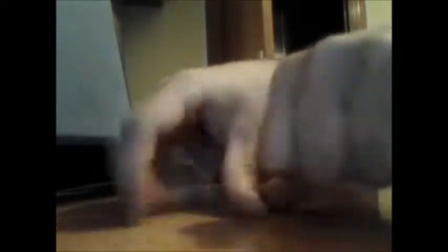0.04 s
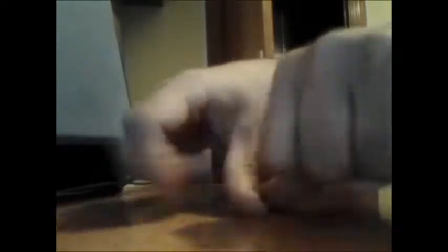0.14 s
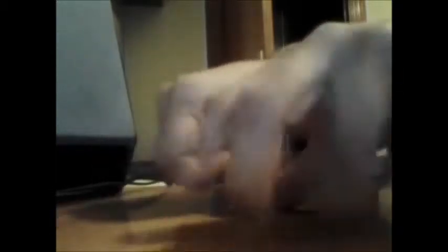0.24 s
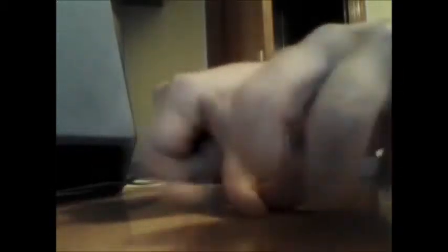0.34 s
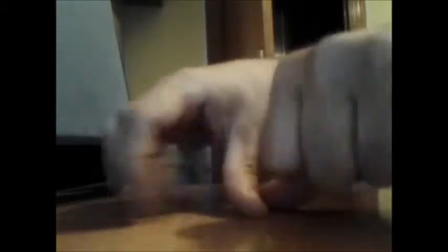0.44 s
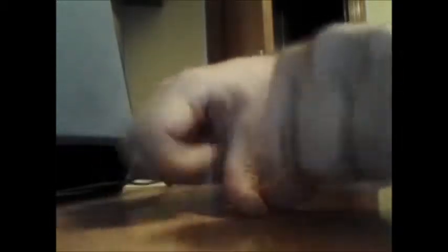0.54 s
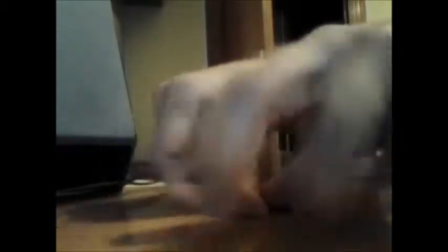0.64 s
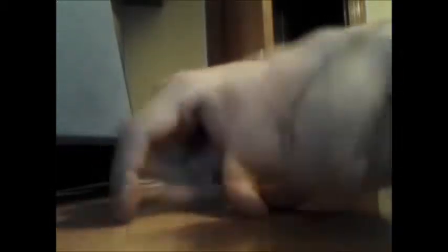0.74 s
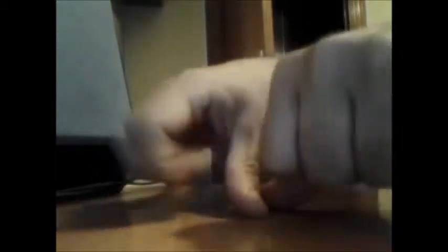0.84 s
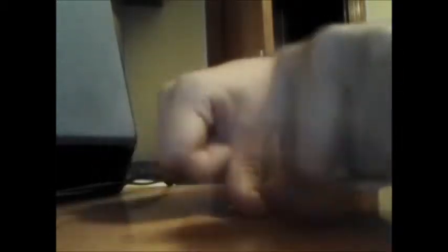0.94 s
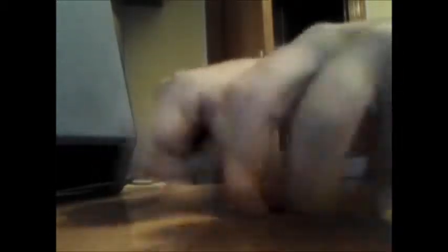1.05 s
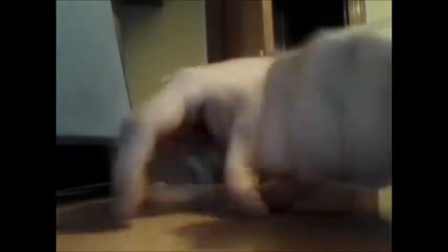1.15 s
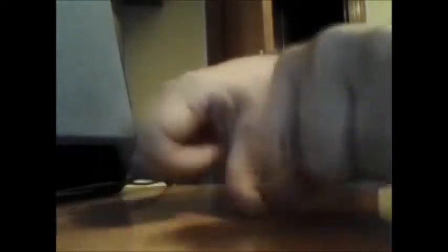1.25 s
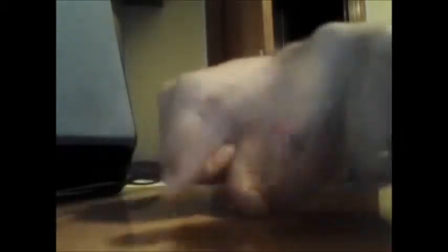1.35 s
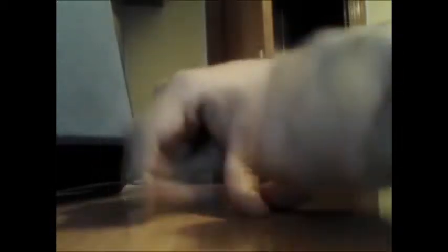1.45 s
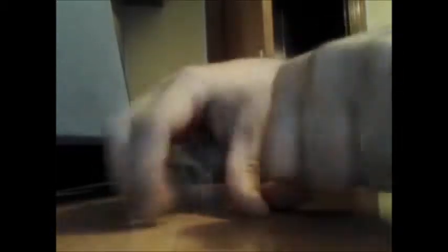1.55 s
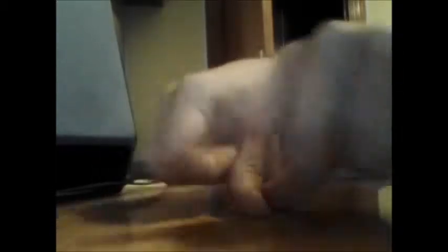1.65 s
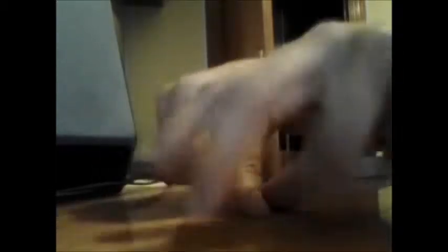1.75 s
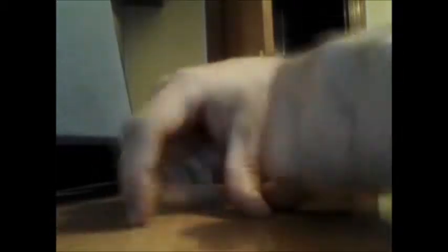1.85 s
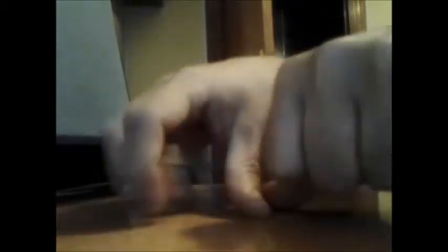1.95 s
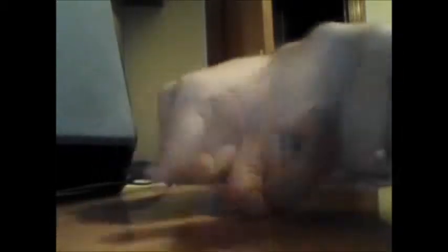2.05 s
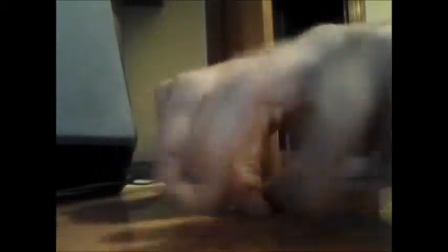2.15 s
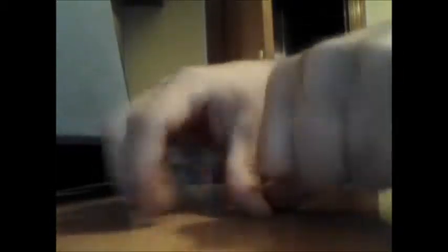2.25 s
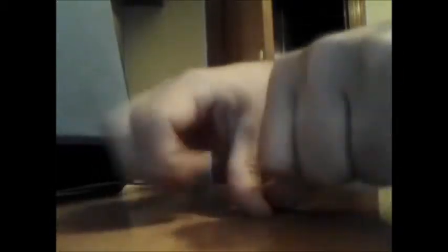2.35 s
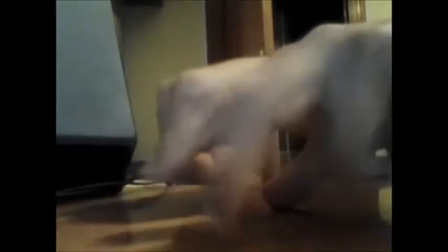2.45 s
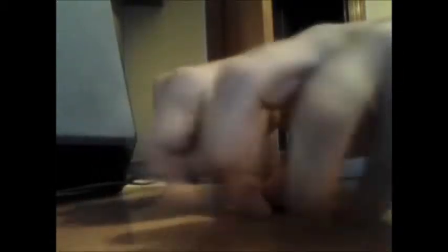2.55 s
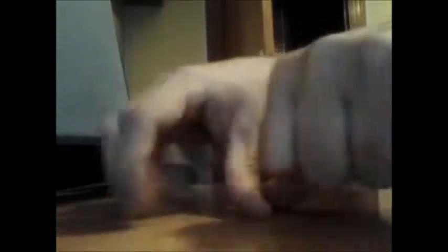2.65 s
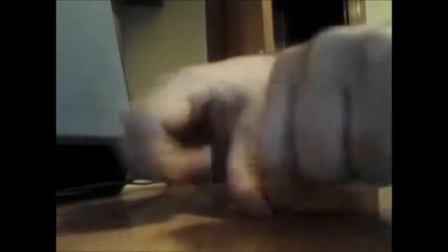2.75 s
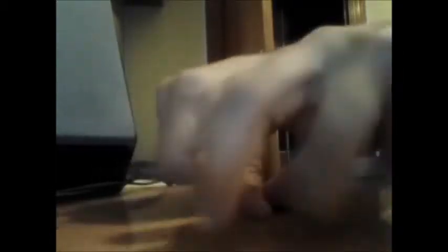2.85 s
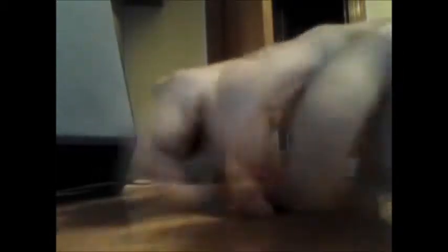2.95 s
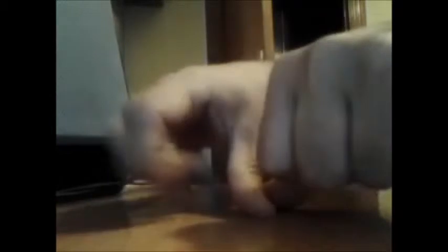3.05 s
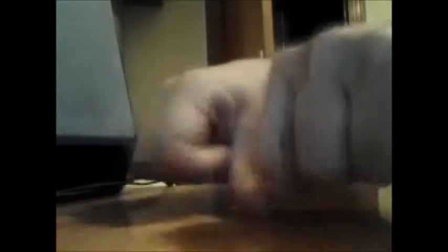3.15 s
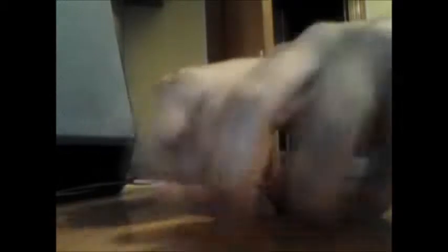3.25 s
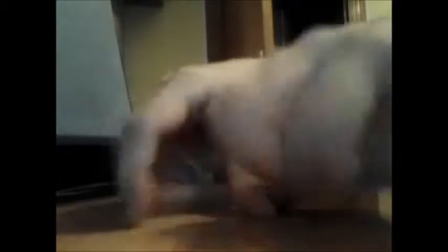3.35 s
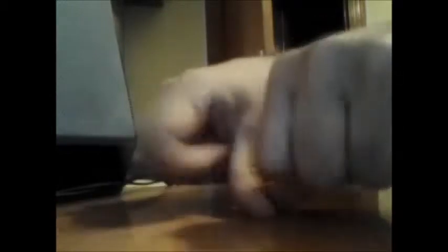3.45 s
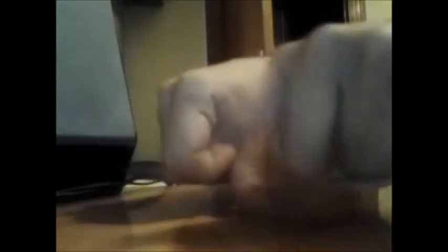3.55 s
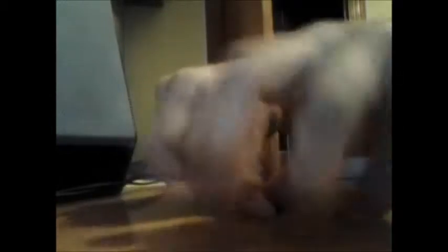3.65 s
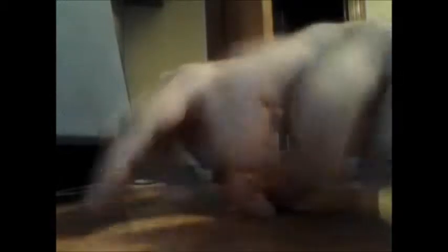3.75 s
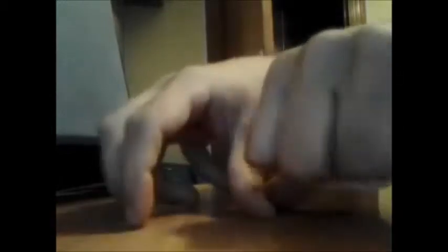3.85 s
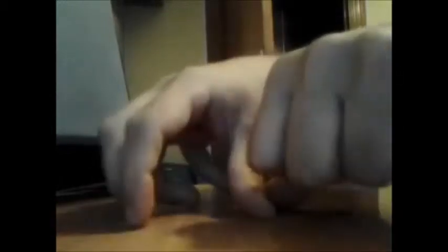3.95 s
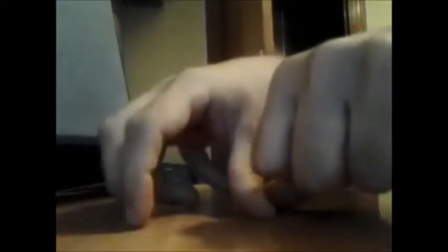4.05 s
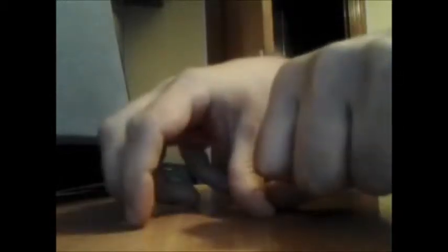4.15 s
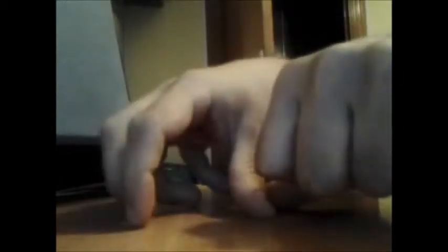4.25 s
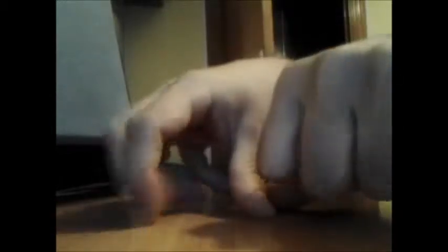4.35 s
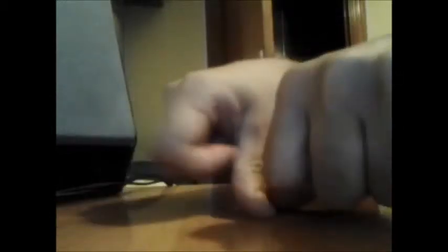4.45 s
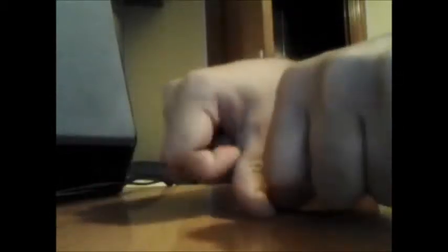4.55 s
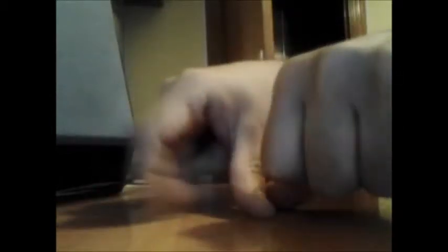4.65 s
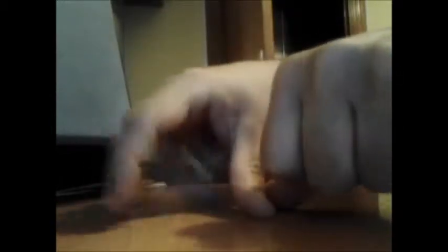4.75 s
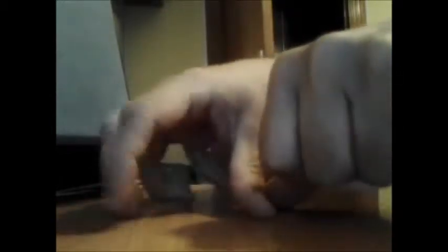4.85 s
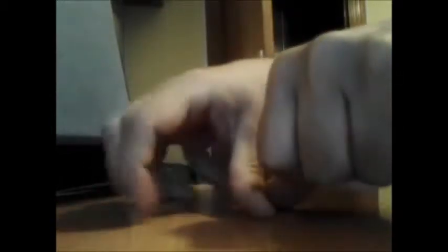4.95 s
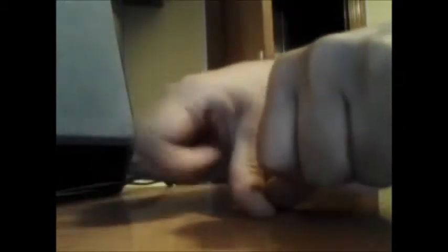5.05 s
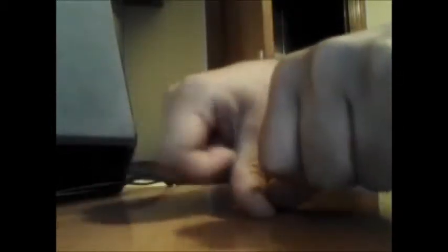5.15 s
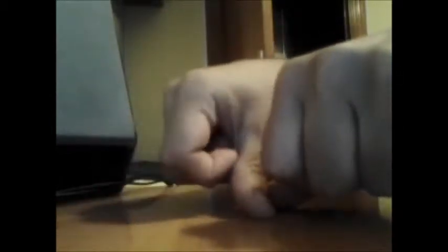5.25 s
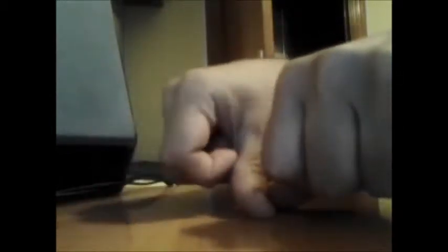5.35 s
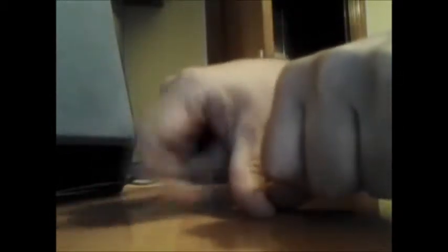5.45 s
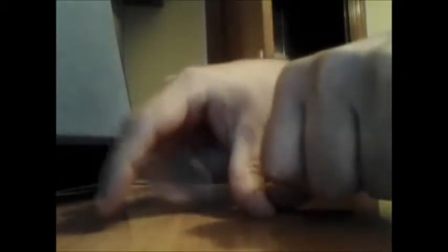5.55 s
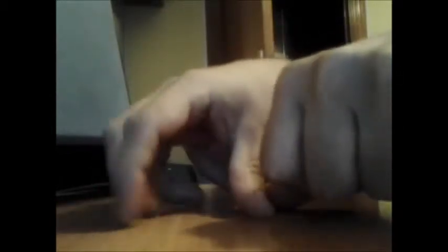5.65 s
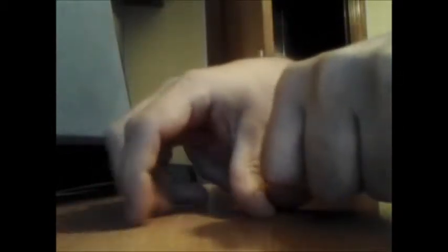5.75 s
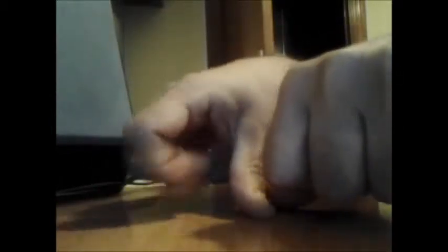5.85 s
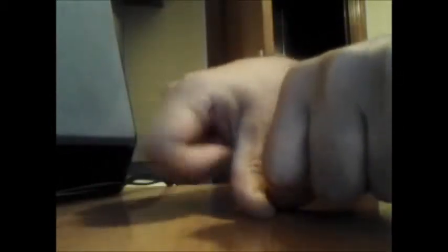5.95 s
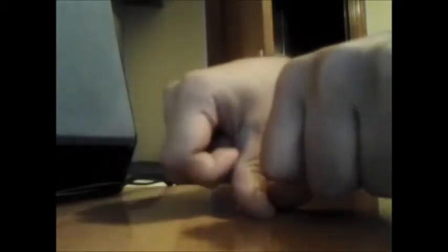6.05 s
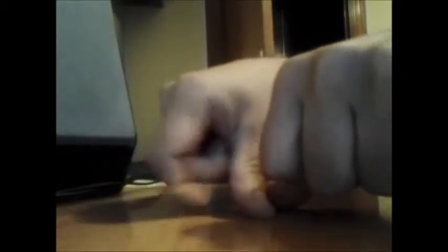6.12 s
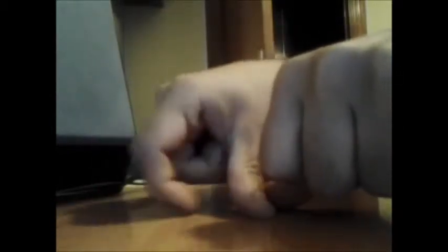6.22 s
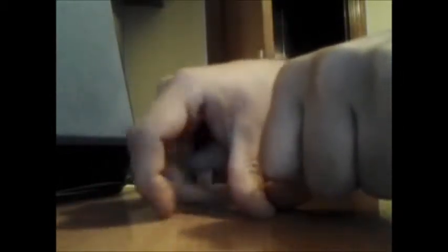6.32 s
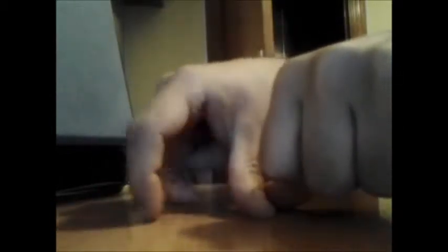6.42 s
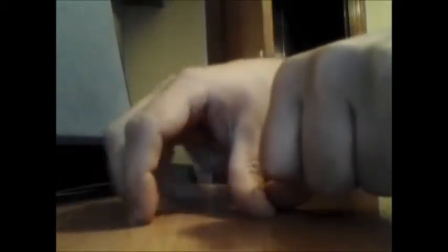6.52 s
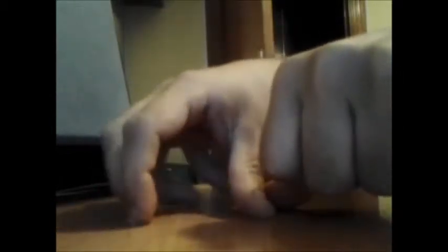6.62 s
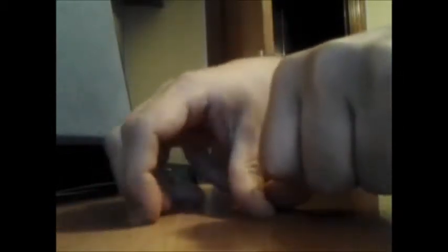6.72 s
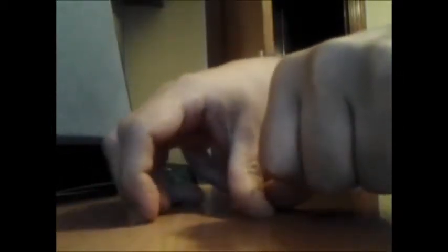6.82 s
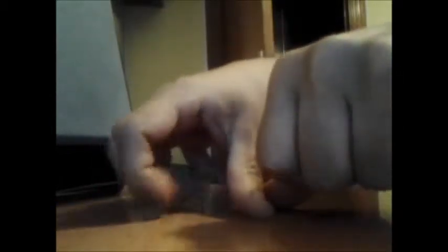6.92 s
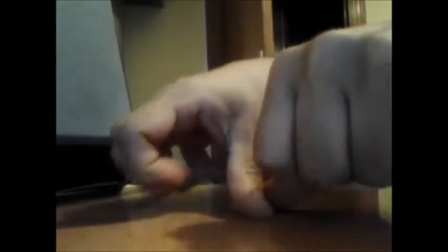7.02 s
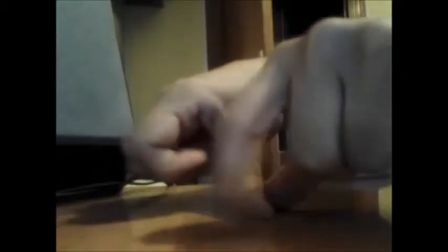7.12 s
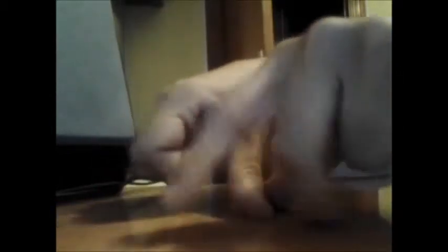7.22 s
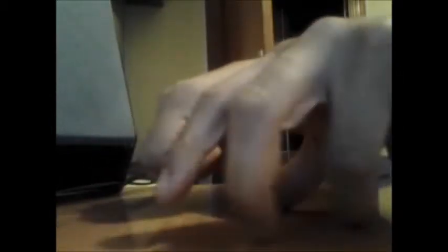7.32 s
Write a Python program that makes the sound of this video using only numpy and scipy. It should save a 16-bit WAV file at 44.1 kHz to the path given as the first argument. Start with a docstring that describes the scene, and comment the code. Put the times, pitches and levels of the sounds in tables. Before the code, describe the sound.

From the very start, two hands drum on a wooden desk close to the microphone, trading fast four-finger rolls at about five or six rolls a second in a continuous gallop. Each fingertip makes a short, hollow, woody knock with a small nail tick, and the hardest hits overload the microphone slightly. The run stops at about 4 seconds. After a pause, one hand plays a slower, softer roll at around 4.8 seconds and another at around 5.6 seconds. Four single taps follow, evenly spaced between 6.3 and 6.8 seconds, and one last, duller tap lands at about 7.2 seconds. The room is small, adding a close echo and a brief ring behind each knock. A quiet, steady fan and faint hiss continue throughout, and the overall sound has little high treble.

```python
"""A small room with a quiet fan, where two hands drum on a wooden desk close to a webcam microphone. The hands
trade fast four-finger rolls; then the far one plays two slow rolls, and a few single taps follow. Each
fingertip pushes the board into a short woody ring while its nail adds a tick. A close echo hollows the knocks,
the room rings on behind them, and the hardest taps overload the microphone input."""
import sys
import numpy as np
from scipy import signal
from scipy.fft import rfft, irfft
from scipy.io import wavfile
from scipy.ndimage import uniform_filter1d

SR = 44100
rng = np.random.default_rng(int(sys.argv[2]) if len(sys.argv) > 2 else 0)


def transcribe(u):
    """Save the signal u as a 16-bit wav file named by the first command-line argument.

    u: samples, shape (n,) or (channels, n), limited to [-1, 1]; the rate is SR.
    q: integer samples, one column per channel.
    """
    v = np.clip(np.atleast_2d(u).T, -1, 1)
    q = np.round(v * 32767).astype(np.int16)
    wavfile.write(sys.argv[1], SR, q)


N = 325458

# tone colour of fan air and microphone hiss: (frequency [Hz], relative level [dB])
AIR_SPECTRUM = [(15, -55), (25, -11.5), (33, -5.5), (66, -9.5), (123, -23.5), (339, -8.5), (411, -6.5),
                (442, -4.5), (590, -5.5), (650, -3.5), (1030, -4), (1110, -7.5), (1190, -7), (6920, -18.5),
                (8000, -44.5), (10400, -56), (17600, -120)]
# faint fan tones: (pitch [Hz], relative level [dB])
FAN_TONES = [(452.2, -69.5), (516.8, -75), (656.8, -65.5), (1093, -67)]
# four-finger rolls; an outer finger lands upright (flatness under 1) or on its pad (over 1):
# (little finger time [s], ring time [s], middle time [s], index time [s], hand [0 near, 1 far],
#  accent [dB], little finger flatness [ratio], ring finger flatness [ratio])
FINGER_ROLLS = [(0.0201, 0.0752, .1101, .1618, 0, -0.47, 0.69, 0.96),
                (0.1818, .229, .271, .3189, 1, 0.04, 1.02, 1.16),
                (.3638, .4149, .4547, .5044, 0, 0.58, 1.64, 1.01),
                (.5314, .5846, .6309, .6822, 1, 0.54, 1.22, 0.91),
                (0.7276, 0.7789, .8253, .891, 0, 1.3, 1.42, 1.05),
                (0.8949, .9417, .9815, 1.033, 1, -0.1, 0.97, 0.93),
                (1.1158, 1.157, 1.202, 1.2501, 0, 0, 0.85, 1.09),
                (1.2565, 1.3105, 1.36, 1.414, 1, 0.15, 1.2, 1.22),
                (1.4577, 1.5125, 1.5545, 1.6042, 0, 0.77, 1.09, 0.85),
                (1.6379, 1.6845, 1.7266, 1.7851, 1, 0, 0.95, 0.89),
                (1.8242, 1.8733, 1.9249, 1.9823, 0, -.3, 0.46, 0.87),
                (2.003, 2.0581, 2.0976, 2.1577, 1, -0.46, 0.88, .82),
                (2.2, 2.2458, 2.3027, 2.3619, 0, -0.14, .85, 1),
                (2.362, 2.415, 2.4618, 2.511, 1, 0.5, 1.34, 0.89),
                (2.579, 2.6204, 2.6659, 2.7186, 0, 1, 1.14, 0.84),
                (2.7383, 2.7984, 2.8379, 2.9025, 1, 0.1, 1.17, 1.06),
                (2.946, 2.9885, 3.0343, 3.09, 0, -.5, 1.7, 1.3),
                (3.1228, 3.1656, 3.2071, 3.2583, 1, 1.5, 1.15, 1.09),
                (3.3301, 3.3839, 3.4314, 3.4776, 0, 1.15, 0.88, 0.88),
                (3.4627, 3.5166, 3.5528, 3.6059, 1, -0.35, 1.33, 1.04),
                (3.707, 3.7452, 3.7922, 3.8354, 0, 0.08, 0.99, 1.29),
                (3.8737, 3.9064, 3.9352, 4.0168, 1, -1.54, 0.98, 0.89),
                (4.8382, 4.884, 4.9409, 5.0249, 1, -4.5, 1.82, 1.43),
                (5.6491, 5.6978, 5.7591, 5.8328, 1, -3.5, 1.46, 1.15)]
# near hand's basic touch, little finger to index: (strength [dB], contact time [ms], nail tick [dB])
NEAR_TOUCH = [(-0.6, 0.54, -19.5), (4, 0.53, -24.5), (4, 0.68, -26), (5.5, 0.68, -27)]
# far hand's, with ring and middle on the nail: (strength [dB], contact time [ms], nail tick [dB])
FAR_TOUCH = [(3, 0.59, -24), (1.6, 0.37, -17.5), (2.5, 0.38, -14.5), (5, 0.77, -26)]
# modes of the board: (pitch [Hz], t60 [s], level under near hand [dB], level under far hand [dB])
DESK_MODES = [(257, 0.012, -50.5, -28), (397.6, 0.035, -19, -19.5), (505, 0.025, -28, -14.5),
              (504, 0.11, -18, -19), (717, 0.058, -15.5, -16), (726.8, 0.015, 2.5, 1.5),
              (797, 0.015, 2, 1.5), (845.3, 0.036, -27, -19), (1157, 0.014, -35, -12),
              (1145.5, 0.079, -20, -26.5), (1300, 0.013, -15, -8.5), (1440, 0.014, -8.5, -4.5),
              (1617, 0.012, -6.5, -5), (2020, 0.011, 5.5, 0), (2623, 0.0044, 12, 14),
              (2682, 0.0099, 10, 9.5), (3138, 0.013, 2.5, -4), (3717, 0.0077, 7, 7.5),
              (4760, 0.0016, 13.5, 9), (6400, 0.0031, 3.5, 1)]
# bands of the room's reverb: (frequency [Hz], level [dB], t60 [s])
REVERB_BANDS = [(178, -26, 0.4), (284, -4.5, 0.22), (332, 10, 0.21), (413, 15, 0.25), (530, 12, 0.19),
                (790, 18.5, 0.31), (920, 16.5, 0.18), (1500, 18.5, 0.32), (2354, 14.5, 0.34),
                (3250, 22, 0.24), (5030, 15, 0.19), (6800, 10, 0.28)]
# standing waves of the desk corner: (pitch [Hz], level [dB], t60 [s])
CORNER_MODES = [(328.6, -38, 0.17), (429.7, -34.5, 0.14), (518, -21.5, 0.12), (660.7, -56.5, 0.072),
                (782.5, -27.5, 0.22), (863, -38.5, 0.22), (988, -38.5, 0.4), (1291, -33, 0.37)]
# closing single taps, which ring the board from the far spot: (time [s], strength [dB], contact time [ms], nail
# tick [dB])
CLOSING_TAPS = [(6.3453, 2.5, 0.94, -28.5), (6.4895, -1.5, 0.54, -23.5), (6.647, -0.5, .54, -21),
                (6.7796, 4.5, 0.8, -28), (7.2338, -1, 1.04, -25)]


def undb(db):
    """Decibels to gain."""
    return 10 ** (np.asarray(db) / 20)


def fade(t, t60):
    """Exponential decay that loses 60 dB in t60 seconds."""
    return np.exp(-np.log(1000) * t / t60)


def add(track, start, sound):
    """Mix a sound into a track at a time in seconds."""
    i = int(start * SR)
    track[i:i + len(sound)] += sound[:len(track) - i]


def butter(x, hz, kind, order):
    """Butterworth high-pass or low-pass."""
    return signal.sosfilt(signal.butter(order, hz, kind, fs=SR, output="sos"), x)


def fan_and_hiss(air_db=-54, tone_trim_db=-2, waver_hz=1.8):
    """A smooth bed of fan air and microphone hiss with a few faint, wavering fan tones."""
    hz, db = np.transpose(AIR_SPECTRUM)
    log_hz = np.log(np.maximum(np.fft.rfftfreq(N, 1 / SR), 1))
    colour = undb(np.interp(log_hz, np.log(hz), db))
    air = irfft(colour * rfft(rng.standard_normal(N)), N)
    bed = undb(air_db) * air / air.std()
    for tone_hz, tone_db in FAN_TONES:
        drift = uniform_filter1d(rng.standard_normal(N), SR // 10)
        phase = 2 * np.pi * np.cumsum(tone_hz + waver_hz * drift / drift.std()) / SR
        bed += np.sqrt(2) * undb(tone_db + tone_trim_db) * np.sin(phase)
    return bed


def roll_taps(hand, touches, scatter_db=0.55, scatter_contact=0.02):
    """One hand's rolls, tap by tap: a flatter finger lands heavier, stays longer and hides its nail."""
    for *landings, played_by, accent_db, little_flatness, ring_flatness in FINGER_ROLLS:
        if played_by != hand:
            continue
        flatnesses = (little_flatness, ring_flatness, 1, 1)
        for start, (db, contact_ms, nail_db), flatness in zip(landings, touches, flatnesses):
            push, give = rng.standard_normal(2)
            doublings = np.log2(flatness)
            db += accent_db + 1.1 * doublings + scatter_db * push
            contact_ms *= flatness * np.exp(scatter_contact * give + 0.0059 * accent_db)
            nail_db += 0.35 * accent_db - 6 * doublings  # a gentler blow also spares the nail
            yield start, db, contact_ms, nail_db


def finger_force(contact_ms, nail_db):
    """The pad gives a smooth push, duller the longer it lasts; the nail adds an instant tick."""
    ms = np.arange(256) * 1000 / SR
    push = np.sin(np.pi * np.minimum(ms / contact_ms, 1)) ** 2
    force = push / push.sum()
    force[0] += undb(nail_db)
    return force


def desk_ring(hand, spot_db=1.1046, detune=0.0047):
    """The woody body of a knock: the board's modes ring, struck on a slightly different spot each time."""
    modes = np.array(DESK_MODES)
    t = np.arange(SR // 4) / SR
    spot, load = rng.standard_normal((2, len(modes)))
    hz = modes[:, 0] * (1 + detune * load)
    rings = fade(t, t60=modes[:, 1:2]) * np.sin(2 * np.pi * hz[:, None] * t)
    # neighbouring modes swing in opposite directions at the microphone
    polarity = (-1) ** np.arange(len(modes))
    gains = polarity * undb(modes[:, 2 + hand] + spot_db * spot)
    return gains @ rings


def desk_treble(db=14, t60=0.025, from_hz=2400):
    """The snap of a knock: densely packed treble modes blur into noise, a new mix on every spot."""
    t = np.arange(2048) / SR
    snap = butter(rng.standard_normal(len(t)), from_hz, "high", order=2) * fade(t, t60)
    return undb(db) * snap / np.linalg.norm(snap)


def drumming(bass_cut_hz=376):
    """The force of each hand on the desk, and the knocks of the board, with their bass cut away steeply."""
    forces, knocks = np.zeros((2, N)), np.zeros(N)
    near_taps = list(roll_taps(0, NEAR_TOUCH))
    far_taps = list(roll_taps(1, FAR_TOUCH)) + CLOSING_TAPS
    for hand, taps in enumerate((near_taps, far_taps)):
        for start, db, contact_ms, nail_db in taps:
            force = undb(db) * finger_force(contact_ms, nail_db)
            add(forces[hand], start, force)
            add(knocks, start, signal.fftconvolve(desk_ring(hand), force))
            add(knocks, start, signal.fftconvolve(desk_treble(), force))
    return forces, butter(knocks, bass_cut_hz, "high", order=3)


def standing_waves(force, build_s=0.013):
    """A few pitches build up between desk and walls and ring on after the knock."""
    t = np.arange(SR // 2) / SR
    rings = sum(undb(db) * fade(t, t60) * np.sin(2 * np.pi * hz * t) for hz, db, t60 in CORNER_MODES)
    swell = np.minimum(t / build_s, 1)
    return signal.fftconvolve(force, rings * swell)[:N]


def room_reverb(force, predelay_s=0.0031, build_s=0.005):
    """The whole board sounds into the room; each band of the dense echoes has its own level and decay."""
    size = SR // 2
    t = np.arange(size) / SR
    hz, db, t60s = np.transpose(REVERB_BANDS)
    log_hz = np.log(np.maximum(np.fft.rfftfreq(size, 1 / SR), 1))
    colour = undb(np.interp(log_hz, np.log(hz), db))
    spectrum = colour * rfft(rng.standard_normal(size))
    onset = np.clip((t - predelay_s) / build_s, 0, 1)
    tail = np.zeros(size)
    for solo, t60 in zip(np.eye(len(hz)), t60s):
        band = irfft(spectrum * np.interp(log_hz, np.log(hz), solo), size)
        envelope = onset * fade(t, t60)
        tail += band * envelope / np.linalg.norm(envelope)
    return signal.fftconvolve(force, tail)[:N]


def close_echo(knocks, delay_s=0.00903, db=-9.5, dull_hz=1700):
    """One dull reflection follows each knock closely and makes it hollow."""
    echo = np.zeros(N)
    add(echo, delay_s, undb(db) * butter(knocks, dull_hz, "low", order=2))
    return echo


def scene():
    """The mono mix: knocks up front, their echo, the room as each hand stirs it, and the fan bed."""
    (near_force, far_force), knocks = drumming()
    reverb = room_reverb(near_force) + room_reverb(far_force) + standing_waves(near_force + far_force)
    return (knocks + close_echo(knocks) + reverb + fan_and_hiss())[None]


def record(dry, speech_band_hz=7000, top_hz=16000):
    """A speech-band microphone that clips at full scale, so only the hardest taps spit above its band."""
    speech_filter = signal.cheby1(12, 0.3, speech_band_hz, fs=SR, output="sos")
    top_filter = signal.ellip(8, 0.2, 70, top_hz, fs=SR, output="sos")
    narrow = signal.sosfilt(speech_filter, dry)
    clipped = np.clip(narrow + 0.0024, -1, 1)  # the input rests a little off centre
    return signal.sosfilt(top_filter, clipped)


dry = scene()
out = record(dry)
transcribe(out)
```